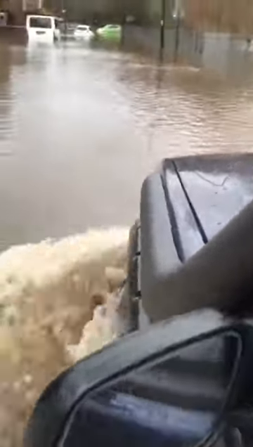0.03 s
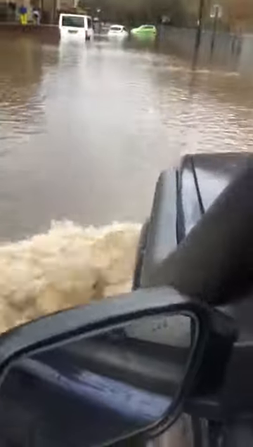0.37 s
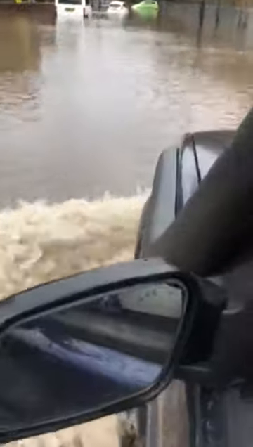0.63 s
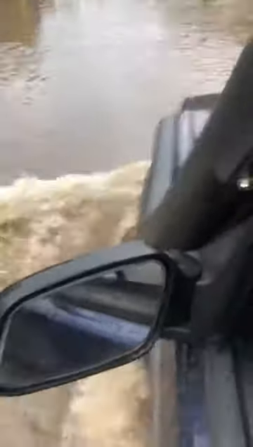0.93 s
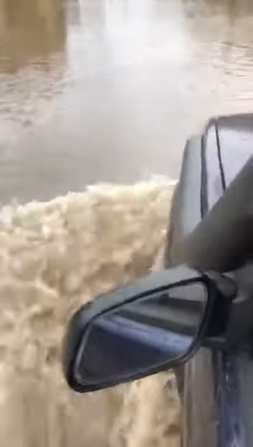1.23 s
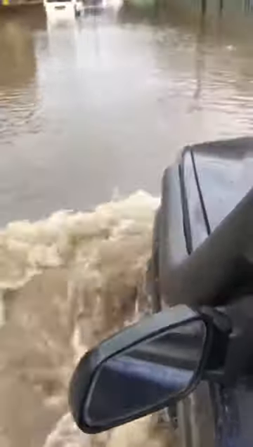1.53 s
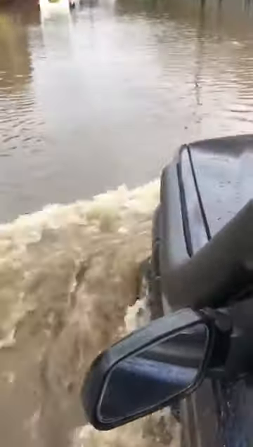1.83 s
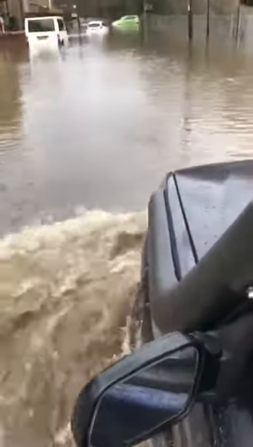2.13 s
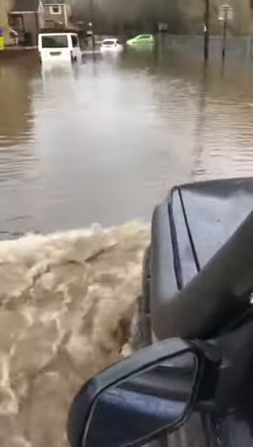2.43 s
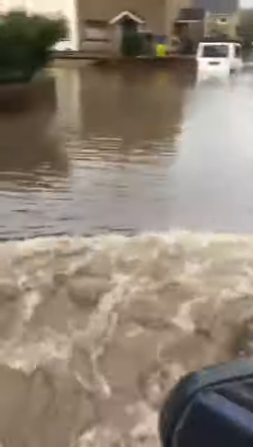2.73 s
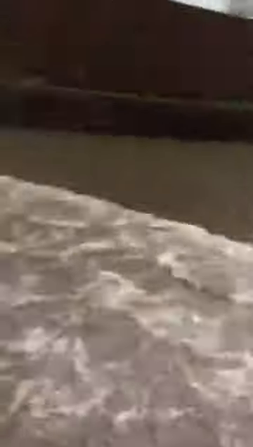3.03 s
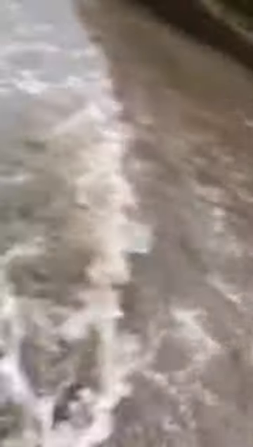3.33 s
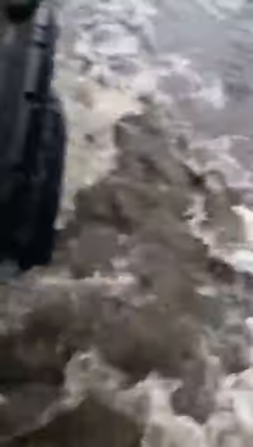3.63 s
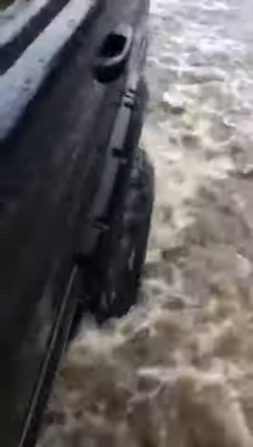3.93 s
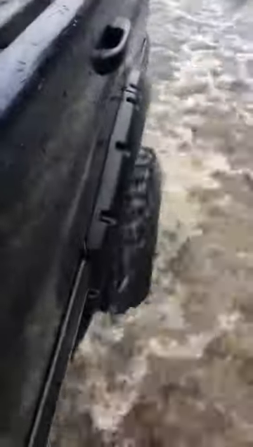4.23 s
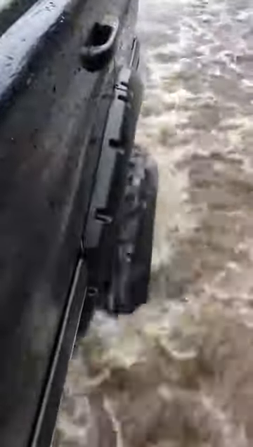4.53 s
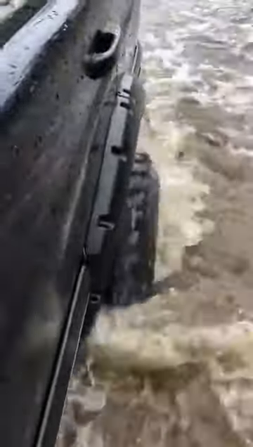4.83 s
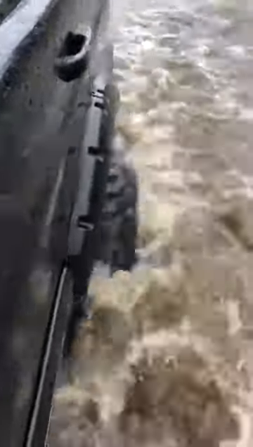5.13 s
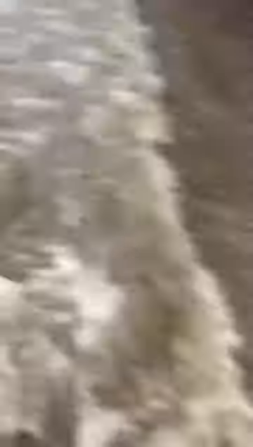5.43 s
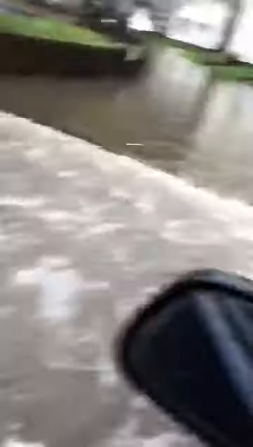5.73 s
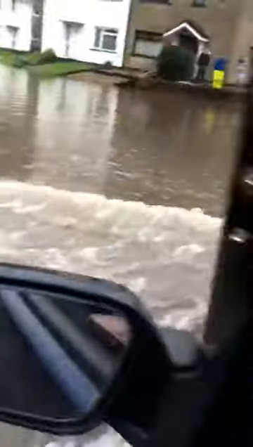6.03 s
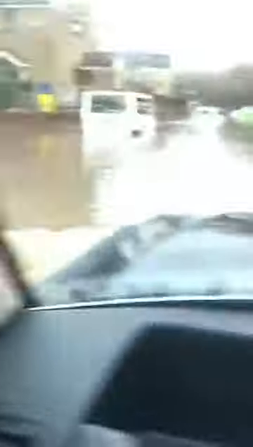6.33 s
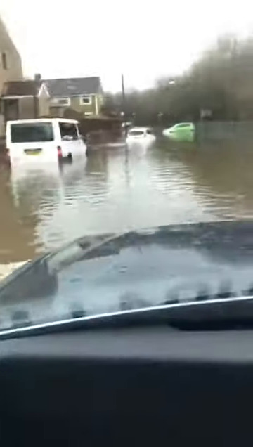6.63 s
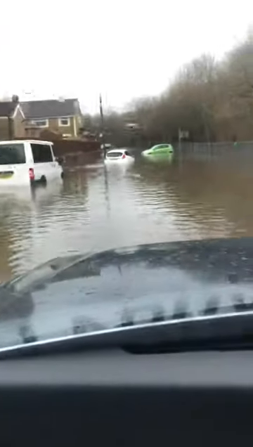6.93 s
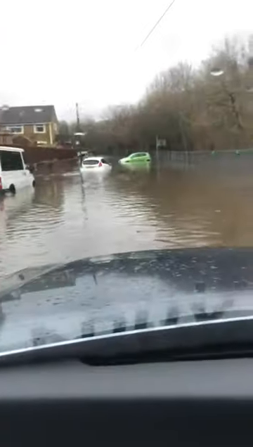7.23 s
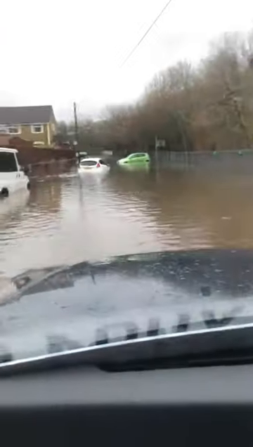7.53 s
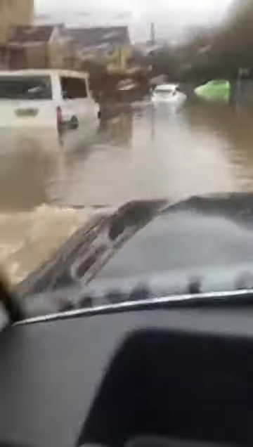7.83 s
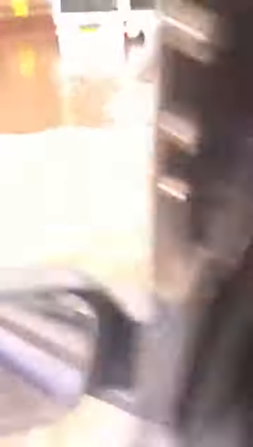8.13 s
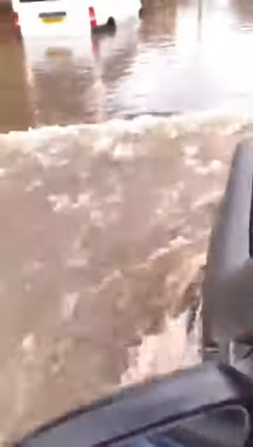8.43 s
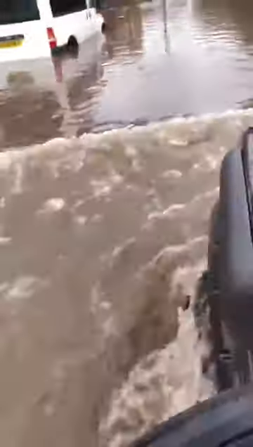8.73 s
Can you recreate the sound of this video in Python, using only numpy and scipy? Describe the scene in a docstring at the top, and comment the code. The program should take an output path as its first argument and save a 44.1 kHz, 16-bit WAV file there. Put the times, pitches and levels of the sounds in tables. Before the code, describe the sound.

At the open side window of an off-road vehicle wading through deep floodwater, a diesel engine drones and throbs while the bow wave churns, bubbles and sprays. The microphone turns toward the rear wheel, where the exhaust and sloshing grow stronger, with small sharp splashes. It is then drawn into the cabin, muffling the water as the revs rise slightly, before leaning out into the full rush again.

```python
"""Deep floodwater, at the open side window of a wading five-cylinder diesel off-roader.
Firings boom through the body, unequal cylinders make the exhaust throb, and water buffets the underside.
The bow wave churns and sprays with ringing bubbles; air pockets gulp and thrown water slaps.
The microphone turns to the rear wheel from about 3 s, is drawn into the cabin near 6 s as the revs
rise, and leans out again at 8 s."""
import sys
import numpy as np
from scipy import signal
from scipy.fft import rfft, irfft, next_fast_len
from scipy.io import wavfile
from scipy.ndimage import uniform_filter1d

SR = 44100
rng = np.random.default_rng(int(sys.argv[2]) if len(sys.argv) > 2 else 0)


def unload_wav(signal):
    """Save mono or channel-first audio to the path in sys.argv[1] as 16-bit WAV at rate SR, clipped to [-1, 1]."""
    wavfile.write(
        sys.argv[1],
        SR,
        np.round(np.clip(np.atleast_2d(signal).T, -1, 1) * 32767).astype(np.int16),
    )


N = 396459
TIME_S = np.arange(N) / SR
CYLINDERS, CRUISE_HZ = 5, 61


def amp(db):
    """Decibels to gain."""
    return 10 ** (np.asarray(db) / 20)


def unit(x):
    """Scales to rms 1."""
    return x / np.sqrt(np.mean(x ** 2) + 1e-20)


def curve(rows):
    """Interpolates (seconds, value) rows per sample."""
    return np.interp(TIME_S, *np.transpose(rows))


def swells(rows):
    """Bell-shaped rises or dips, one curve per dB column."""
    return sum(np.outer(db, np.exp(-((TIME_S - centre_s) / half_s) ** 2))
               for centre_s, half_s, *db in rows).squeeze()


def colour(x, spectrum):
    """Filters by (Hz, dB) rows; rms 1."""
    size = next_fast_len(N)
    hz, db = np.transpose(spectrum)
    bins_hz = np.fft.rfftfreq(size, 1 / SR)
    gain = amp(np.interp(np.log(bins_hz + 1), np.log(hz), db))
    return unit(irfft(rfft(x, size) * gain, size)[:N])


def drift(rate_hz):
    """Random wander, rms 1."""
    knots = rng.standard_normal(2048)
    return unit(np.interp(TIME_S * rate_hz, np.arange(len(knots)), knots))


def add(mix, start_s, sound):
    """Mixes a sound in."""
    part = mix[round(start_s * SR):][:len(sound)]
    part += sound[:len(part)]


# Engine speed. Each row: time in seconds, firing rate in Hz.
FIRING_HZ = [(0, 60.6), (2.4, 61.12), (2.85, 62.02), (3.9, 60.81), (5.8, 61.57), (6.13, 68.7), (6.4, 69.34),
             (6.9, 65), (7.28, 64.15), (7.6, 68.1), (8.1, 66.05), (8.99, 66.7)]
# Microphone place. Each row: time in seconds, 0 at the window to 1 in the cabin.
MIC_INSIDE = [(5.55, 0), (6.2, 0.37), (6.48, 1), (7.8, .92), (7.97, 0.47), (8.32, 0.011)]
# Microphone aim. Each row: time in seconds, 0 ahead to 1 rearward.
MIC_REARWARD = [(2.9, 0.036), (3.6, 0.82), (4.4, 1), (5.4, 0.75), (5.85, 0.12)]

def heard(window_db, cabin_db, rear_db, db_per_hz=0):
    """Level in dB at the window, offset by microphone place, aim and firing rate above cruise."""
    mic_db = cabin_db * curve(MIC_INSIDE) + rear_db * curve(MIC_REARWARD)
    return window_db + mic_db + db_per_hz * (curve(FIRING_HZ) - CRUISE_HZ)


# Drone sags. Each row: centre and half width in seconds, firing tone and octave changes in dB.
SAGS = [(0, .24, 1.5, -13), (5.74, .15, -2.5, -6.5), (7.17, .28, -3.2, -6.8), (7.75, 0.35, -3.3, 0)]

def boom(cycle, body_hz=201.8, body_width_hz=11):
    """Firing tone and octave boom through the body; the third harmonic climbs into a resonance."""
    tone_db, octave_db = swells(SAGS)
    tone_db += heard(-20.9, cabin_db=-1.5, rear_db=-0.5, db_per_hz=0.55) + 0.27 * drift(23)
    octave_db += heard(-21.3, cabin_db=-0.8, rear_db=3.4, db_per_hz=0.28) + 0.67 * drift(20)
    third_db = heard(-25.8, cabin_db=-4, rear_db=-2)
    angle = 2 * np.pi * CYLINDERS * cycle
    octave = np.cos(2 * angle - np.pi / 8)  # lag: one tall and one small swing per firing
    detune = 2 * (3 * curve(FIRING_HZ) - body_hz) / body_width_hz
    third = (np.exp(3j * angle) / (1 + 1j * detune)).real
    return np.sqrt(2) * (amp(tone_db) * np.cos(angle) + amp(octave_db) * octave + amp(third_db) * third)


def partials(cycle, rows, waver):
    """Multiples of the engine cycle, wavering because no two burns are alike."""
    out = np.zeros(N)
    for multiple, db in rows:
        angle = 2 * np.pi * (multiple * cycle + rng.random())
        out += amp(db) * ((1 + waver * drift(7)) * np.cos(angle) + waver * drift(7) * np.sin(angle))
    return np.sqrt(2) * out


# Throb partials. Each row: multiple of the engine cycle, relative level in dB.
EXHAUST_PARTIALS = [(6, -52), (7, -38.5), (8, -40), (9, -27.5), (11, -69), (12, -38.5), (13, -31.5),
                    (14, -32), (16, -40), (17, -31), (18, -33), (20, -32.5), (21, -30), (24, -44.5),
                    (25, -37), (26, -47), (27, -40), (28, -45)]
CABIN_PARTIALS = [(4, -42), (6, -35), (8, -35), (9, -46), (11, -42), (12, -32), (13, -38), (14, -36.5),
                  (16, -34.5), (17, -48), (18, -40), (19, -36.5), (20, -43), (21, -41.5), (24, -45),
                  (25, -45.5)]

def throb(cycle):
    """Unequal cylinders fill in tones between the firing harmonics, in exhaust and cabin."""
    exhaust_db = heard(-7, cabin_db=-11.5, rear_db=7, db_per_hz=-0.03)
    interior_db = heard(-12, cabin_db=-1, rear_db=1, db_per_hz=1.38)
    exhaust = amp(exhaust_db) * partials(cycle, EXHAUST_PARTIALS, waver=0.28)
    interior = amp(interior_db) * partials(cycle, CABIN_PARTIALS, waver=0.35)
    return exhaust + interior


# Knock spectrum. Each row: frequency in Hz, gain in dB.
CLATTER_SPECTRUM = [(150, -15), (320, 1), (470, 5.5), (600, -1.5), (800, -8), (1000, -0.5), (1300, -0.5),
                    (1600, -5.5), (2300, -11), (5000, -25), (7000, -14), (12000, -42)]

def clatter(cycle, level_db=-39, decay_firings=1.0, lope=0.11):
    """Diesel knock through the bulkhead: a noise puff per firing, uneven over the cycle."""
    puffs = np.exp(-(CYLINDERS * cycle % 1) / decay_firings)
    uneven = 1 + lope * np.cos(2 * np.pi * cycle)
    return amp(level_db) * colour(puffs * uneven * rng.standard_normal(N), CLATTER_SPECTRUM)


# Body spectra. Each row: frequency in Hz, gain in dB.
RUMBLE_SPECTRUM = [(25, -32), (50, -6), (85, 0), (120, 1), (170, 0.5), (250, -4.5), (330, -10),
                   (450, -21.5), (900, -53)]
SHUDDER_SPECTRUM = [(15, -50), (28, -22), (38, -5), (45, -3), (58, -11), (90, -17), (200, -64)]
PANEL_SPECTRUM = [(110, -30), (200, -14.5), (235, -2), (252, -1), (275, -10), (320, -8.5), (380, -15),
                  (600, -44)]
# Body jolts; water leaning on the door. Each row: centre and half width in seconds, boost in dB.
JOLTS = [(7.46, .14, 9)]
DOOR_PUSHES = [(.8, 0.82, 7.5), (8.3, 0.24, 3)]

def buffeting():
    """Water buffets the underside: broad rumble, the body's lowest resonance, a drumming door panel."""
    rumble_db = heard(-30.5, cabin_db=-0.42, rear_db=3.7)
    shudder_db = heard(-43.5, cabin_db=9, rear_db=1) + swells(JOLTS)
    panel_db = heard(-36.2, cabin_db=-13, rear_db=2, db_per_hz=1.25) + swells(DOOR_PUSHES)
    layers = (rumble_db, RUMBLE_SPECTRUM), (shudder_db, SHUDDER_SPECTRUM), (panel_db, PANEL_SPECTRUM)
    return sum(amp(db) * colour(rng.standard_normal(N), spectrum) for db, spectrum in layers)


def turbulence(patch_db, patch_s, patch_hz, size=256):
    """White noise whose level wanders in patches of time and frequency."""
    hop = size // 4
    real, imag, patches = rng.standard_normal((3, N // hop + 8, size // 2 + 1))
    patches = uniform_filter1d(patches, max(1, round(patch_s * SR / hop)), axis=0)
    patches = uniform_filter1d(patches, max(1, round(patch_hz * size / SR)), axis=1)
    frames = (real + 1j * imag) * amp(patch_db * unit(patches))
    return signal.istft(frames.T, nperseg=size, noverlap=size - hop)[1][:N]


def bubbles(per_s, low_hz, high_hz, decay_cycles, rise, spread_db, sizes=28):
    """Random bubbles, each a dying sine that rises in pitch."""
    out = np.zeros(N)
    for hz in np.geomspace(low_hz, high_hz, sizes):
        age = np.arange(0, 5, hz / decay_cycles / SR)  # in decay times
        ring = np.sin(2 * np.pi * decay_cycles * age * (1 + rise * age)) * np.exp(-age)
        births = rng.random(N) < per_s / sizes / SR
        strength = amp(spread_db * np.minimum(rng.exponential(1, N), 4))
        out += signal.oaconvolve(births * strength, unit(ring))[:N] * np.sqrt(hz / len(ring))
    return unit(out)


# Bow wave spectra. Each row: frequency in Hz, gain in dB.
CHURN_SPECTRUM = [(60, -30), (180, -10), (300, 0), (450, 0.5), (700, 0.5), (1050, -1), (1450, -4),
                  (2000, -9), (3000, -15), (6000, -23.5), (12000, -45)]
SPRAY_SPECTRUM = [(500, -21), (1400, -1), (2400, -1), (3400, 1), (4500, -1.5), (6000, -3), (8000, -4),
                  (10000, -5.5), (11500, -6), (12500, -24)]
# The wave rears up. Each row: centre and half width in seconds, churn and spray changes in dB.
SURGES = [(.22, 0.27, 2.5, 1.4), (.83, 0.041, 2.2, 1), (8.5, .3, 2.1, -.5)]

def bow_wave(spray_db):
    """The breaking wave churns with large bubbles and throws a fizz of foam and drops."""
    rush = turbulence(patch_db=1.13, patch_s=0.04, patch_hz=450)
    gurgle = bubbles(per_s=1300, low_hz=281.7, high_hz=2777, decay_cycles=5.35, rise=0.019, spread_db=2.5)
    foam = turbulence(patch_db=1.5, patch_s=0.025, patch_hz=900)
    drops = bubbles(per_s=3500, low_hz=1800, high_hz=11350, decay_cycles=3.3, rise=0.016, spread_db=2)
    churn = amp(-0.5) * colour(rush, CHURN_SPECTRUM) + amp(-5.5) * colour(gurgle, CHURN_SPECTRUM)
    spray = amp(-0.5) * colour(foam, SPRAY_SPECTRUM) + amp(-5.5) * colour(drops, SPRAY_SPECTRUM)
    churn_surge_db, spray_surge_db = swells(SURGES)
    churn *= amp(heard(-24.9, cabin_db=-15.3, rear_db=1.3) + churn_surge_db + 0.46 * drift(25))
    spray *= amp(spray_db + spray_surge_db + 0.69 * drift(35))
    return churn + spray


# Tyre slosh spectrum. Each row: frequency in Hz, gain in dB.
SLOSH_SPECTRUM = [(400, -25), (750, -6), (1050, 3), (1400, -2.5), (1900, -7), (3000, -25), (6000, -40)]
# The tyre digs in. Each row: centre and half width in seconds, boost in dB.
TYRE_DIGS = [(5.1, .27, 5)]

def rear_wheel():
    """The tread folds air into the water in uneven lumps of mid-sized bubbles."""
    level_db = heard(-39, cabin_db=-24, rear_db=6.8) + swells(TYRE_DIGS)
    froth = bubbles(per_s=1100, low_hz=602, high_hz=2587, decay_cycles=7.3, rise=0.016, spread_db=3)
    return amp(level_db + 1.2 * drift(22)) * colour(froth, SLOSH_SPECTRUM)


def droplets(level_db):
    """Near drops ping above the foam."""
    pings = bubbles(per_s=30, low_hz=5530, high_hz=10500, decay_cycles=8.4, rise=0.0071, spread_db=4)
    return amp(level_db) * pings


# Air pockets. Each row: start in seconds, relative level in dB, initial pitch in Hz, decay in seconds.
GULPS = [(.095, -16.5, 168, .02), (3.071, -23, 150, .025), (5.58, -13.5, 151.4, 0.024)]

def gulps(attack_s=0.013, glide_per_s=1.28, slap_gain=0.95):
    """A large air pocket slaps the underside, rings low and glides up as it surfaces."""
    out, t = np.zeros(N), np.arange(SR // 4) / SR
    for start_s, db, hz, decay_s in GULPS:
        ring = np.sin(2 * np.pi * hz * t * (1 + glide_per_s * t))
        slap = colour(rng.standard_normal(N), RUMBLE_SPECTRUM)[:len(t)]
        envelope = 2 * (1 - np.exp(-t / attack_s)) * np.exp(-t / decay_s)
        add(out, start_s, amp(db) * envelope * (ring + slap_gain * slap))
    return out


# Splashes. Each row: start in seconds, relative level in dB, pitch in Hz, decay in seconds.
SPLASHES = [(.815, -25, 4520, 0.023), (2.154, -24, 4440, 0.0067), (3.497, -22.5, 4000, 0.011),
            (3.665, -19.5, 6000, 0.0049), (3.893, -21, 7950, .006), (3.992, -24, 3200, .015),
            (5.405, -21.5, 8000, .008), (5.432, -23, 7500, 0.0089), (5.973, -21, 8500, .0029),
            (6.029, -20.5, 6000, .0033), (6.225, -32, 3200, .016)]

def splashes(attack_s=0.00041, gain_db=1.5):
    """Thrown water slaps: short bursts of hiss around one pitch."""
    out, t = np.zeros(N), np.arange(SR // 5) / SR
    for start_s, db, hz, decay_s in SPLASHES:
        band = signal.butter(2, [hz / 1.8, hz * 1.3], "bandpass", fs=SR, output="sos")
        hiss = unit(signal.sosfilt(band, rng.standard_normal(len(t))))
        envelope = (1 - np.exp(-t / attack_s)) * np.exp(-t / decay_s)
        add(out, start_s, amp(db + gain_db) * envelope * hiss)
    return out


def scene():
    """Vehicle and water, the same in both channels."""
    cycle = np.cumsum(curve(FIRING_HZ)) / SR / CYLINDERS  # engine cycles elapsed
    vehicle = boom(cycle) + throb(cycle) + clatter(cycle) + buffeting()
    spray_db = heard(-27.5, cabin_db=-14.2, rear_db=2.4)
    water = bow_wave(spray_db) + rear_wheel() + droplets(spray_db - 17.5) + gulps() + splashes()
    return np.array([vehicle + water] * 2)


def record(dry):
    """Steep low-pass."""
    cutoff_hz = 11950
    taps = signal.firwin(401, cutoff_hz, window=("kaiser", 9), fs=SR)
    return signal.oaconvolve(dry, taps[None], "same")


dry = scene()
out = record(dry)
unload_wav(out)
```